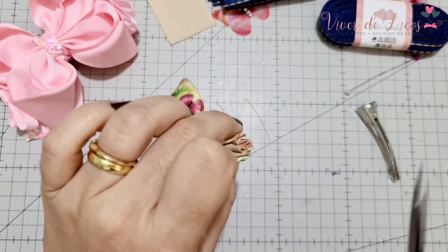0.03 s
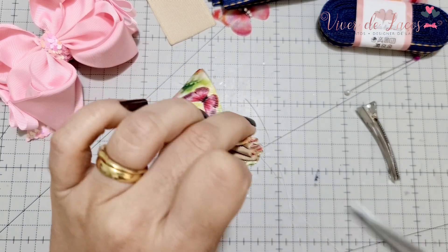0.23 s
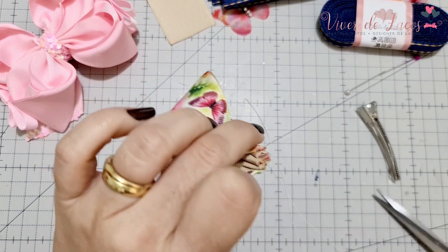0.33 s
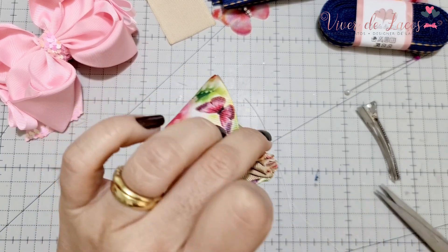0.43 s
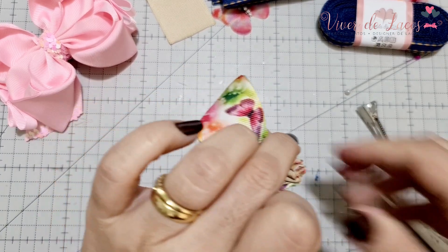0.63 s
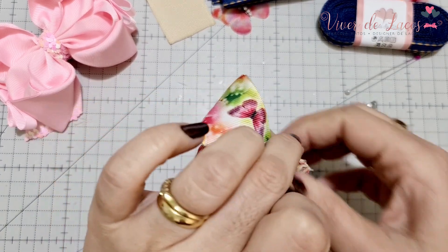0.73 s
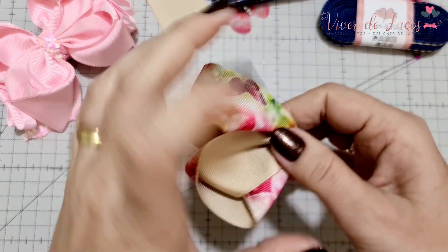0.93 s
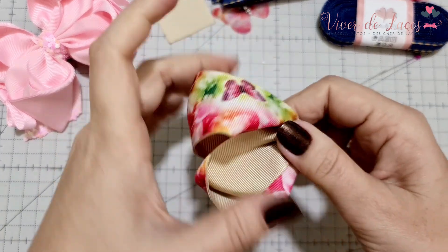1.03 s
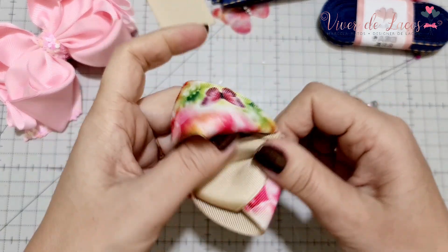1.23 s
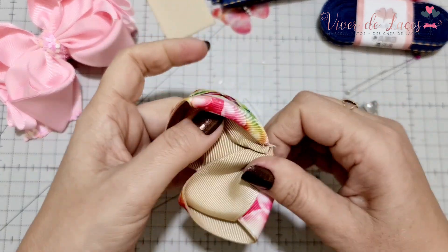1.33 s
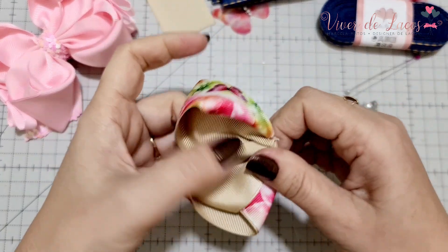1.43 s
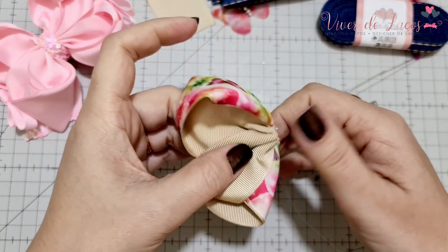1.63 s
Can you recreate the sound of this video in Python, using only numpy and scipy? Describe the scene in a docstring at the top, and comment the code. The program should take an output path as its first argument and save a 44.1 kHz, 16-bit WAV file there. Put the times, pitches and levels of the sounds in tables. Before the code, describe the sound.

Scissors are set down with a few dry clacks, followed by light fingernail ticks on ribbon.

```python
"""Scissors down, ribbon in hand

Small steel scissors click shut and are laid on a cutting mat: dry clacks of hand-damped blades,
each with a knock of the handles and a thud of the table. The hand brushes back over the mat, then
fingers work a ribbon bow with faint nail ticks, rustle and a squeak. A small, quiet room hums low."""
import sys
import numpy as np
from scipy import signal
from scipy.fft import rfft, irfft
from scipy.io import wavfile
from scipy.ndimage import uniform_filter1d

SR = 44100
rng = np.random.default_rng(int(sys.argv[2]) if len(sys.argv) > 2 else 0)


def pcm_store(signal):
    """Save signal as 16-bit PCM."""
    levels = np.round(np.clip(np.atleast_2d(signal), -1, 1) * 32767)
    wavfile.write(sys.argv[1], SR, levels.astype(np.int16).T)


N = 74970
TIME = np.arange(N) / SR

# The scissors' contacts. Each row: start in seconds, blade click in dB, treble in dB,
# pitch favoured by the point of contact in Hz, handle knock in dB, table thud in dB.
SCISSOR_HITS = [(0.1991, -39, 5.5, 5800, -42, -42.5), (0.238, -45.5, 3, 1390, -45, -46),
                (0.339, -33.5, -0.5, 4750, -42, -64.5), (0.3700, -33, -5.5, 1760, -44.5, -38),
                (0.3849, -16, -2, 11600, -36.5, -37), (0.3985, -45, 8, 1400, -42, -39.5),
                (0.45, -30, -5.5, 2530, -52.5, -49.5)]


def from_db(db):
    """Decibels to gain."""
    return 10 ** (np.asarray(db) / 20)


def rms_one(x):
    """Scale to rms 1."""
    return x / np.sqrt(np.mean(x ** 2) + 1e-20)


def at_hz(points, hz):
    """Read a table on a log-frequency axis."""
    freqs, values = np.transpose(points)
    return np.interp(np.log(hz), np.log(freqs), values)


def drift(rate_hz):
    """A smooth random wander with a spread of about 1."""
    pole = np.exp(-80 * np.pi * rate_hz / SR)
    slow = signal.lfilter([1], [1, -2 * pole, pole * pole], rng.standard_normal(N // 40 + 2002))[2000:]
    return np.interp(np.arange(N) / 40, np.arange(len(slow)), rms_one(slow))


def delay(x, seconds):
    """The same sound a little later."""
    return np.roll(x, int(round(seconds * SR)))


def shelf(x, hz, db):
    """Raise or lower the treble above a frequency."""
    w = 2 * np.tan(np.pi * hz / SR)
    a, q = from_db(db) ** (1 / 4), np.sqrt(2)
    return signal.lfilter(*signal.bilinear([a * a, q * a * w, w * w], [1 / (a * a), q * w / a, w * w]), x)


def click(start):
    """A unit click at one moment."""
    return 1.0 * (np.arange(N) == int(start * SR))


def contact(start, treble_db, chatter_db=-5, chatter_t60_s=0.018):
    """One sharp touch and a dying spray of micro-bounces, brightened or dulled."""
    decay = np.exp(-np.log(1000) * np.abs(TIME - start) / chatter_t60_s)
    spray = rng.standard_normal(N) * (TIME > start) * decay
    touch = click(start) + from_db(chatter_db) * spray / np.linalg.norm(spray)
    return shelf(touch, hz=5500, db=treble_db)


def ring(clicks, modes):
    """Each click sets every mode ringing as a dying sine."""
    out = 0
    for hz, db, t60 in modes:
        r, w = from_db(-60 / (t60 * SR)), 2 * np.pi * hz / SR
        mode = signal.lfilter([.5, 0, -.5], [1, -2 * r * np.cos(w), r * r], clicks + 1e-18)
        out = out + from_db(db) * mode
    return out


def diffuse(colour, size=N):
    """Coloured stereo noise from all sides, alike in the bass and unrelated in the treble."""
    # How alike the ears hear it. Each row: frequency in Hz, left-right correlation.
    likeness = [(60, 0.43), (150, .95), (350, 0.68), (700, .4), (1400, 0), (16000, 0)]
    hz = np.maximum(np.arange(size // 2 + 1) * SR / size, 1)
    alike = at_hz(likeness, hz)
    mid, side = rfft(rng.standard_normal((2, size))) * from_db(at_hz(colour, hz)) / np.sqrt(2)
    return irfft(np.sqrt(1 + alike) * mid + np.sqrt(1 - alike) * side * [[1], [-1]], size)


def friction(curve, colour, grains_per_s=6700, spread_db=4):
    """Fibres catch and slip: noise, half smooth and half in tiny uneven grains, under a level curve."""
    slips = rng.random(N) < grains_per_s / SR
    strength = from_db(spread_db * np.minimum(rng.exponential(1, N), 5))
    grains = rms_one(uniform_filter1d(slips * strength, size=40))
    level = from_db(np.interp(TIME, *np.transpose(curve)))
    return level * (0.5 + 0.5 * grains) * rms_one(diffuse(colour))


def room_tone():
    """A soft, dark bed of air."""
    # The air's colour. Each row: frequency in Hz, relative level in dB.
    air_colour = [(20, -22), (45, -2), (75, 5.5), (102, -5.5), (150, -0.5), (240, -4.5), (400, -8.5),
                  (760, -11.5), (980, -18.5), (1300, -17.5), (2200, -29), (3500, -32), (6200, -50.5),
                  (8200, -45.5), (16000, -48)]
    return from_db(-61) * rms_one(diffuse(air_colour))


def hum_tone(hz, db, waver_db=1, wander_rad=0.3):
    """A low tone that wavers in level and phase."""
    amplitude = np.sqrt(2) * from_db(db + waver_db * drift(15))
    return amplitude * np.sin(2 * np.pi * (hz * TIME + rng.random()) + wander_rad * drift(6.2))


def hum(throb_s=0.2447, peak_at_s=0.032, depth=0.42):
    """A throbbing drone with a few weaker tones above it."""
    # The weaker tones. Each row: pitch in Hz, level in dB.
    upper_tones = [(141, -73), (181, -73), (233, -74.5), (290, -76)]
    throb = 1 + depth * np.cos(2 * np.pi * (TIME - peak_at_s) / throb_s)
    return throb * hum_tone(hz=59.34, db=-57.5) + sum(hum_tone(hz, db) for hz, db in upper_tones)


def room_reverb(x, predelay_s=0.0014, build_s=0.0013):
    """The small room answers with a diffuse tail that builds quickly and dies octave by octave."""
    # The tail's colour. Each row: frequency in Hz, gain in dB.
    tail_colour = [(60, 14.5), (200, 15.5), (600, 17), (950, 7.5), (1350, 18), (2000, 16.5), (2600, 17),
                   (3600, 12.5), (5000, 8.5), (6500, -1.5), (8000, 1), (10000, -3), (11800, -1.5),
                   (16000, -12)]
    # The tail's length. Each row: frequency in Hz, T60 in seconds.
    tail_t60 = [(100, 0.74), (1000, 0.42), (3000, 0.31), (8000, .35), (16000, .32)]
    t = TIME[:SR // 2]
    build = 1 - np.exp(-np.maximum(t - predelay_s, 0) / build_s)
    spectrum = rfft(diffuse(tail_colour, len(t)))
    hz = np.arange(spectrum.shape[1]) * SR / len(t)
    tail = 0
    for low in 40 * 2 ** np.arange(9):
        octave = irfft(spectrum * ((hz >= low) & (hz < 2 * low)), len(t))
        fade = build * np.exp(-np.log(1000) * t / at_hz(tail_t60, low * np.sqrt(2)))
        tail = tail + octave * fade / np.linalg.norm(fade)
    return signal.fftconvolve(x[None], tail, axes=1)[:, :N]


def hand_brush():
    """The hand brushes dully back over the mat."""
    # The stroke's swell. Each row: time in seconds, level in dB.
    brush_curve = [(0.52, -75), (0.6, -65), (0.8, -64), (0.89, -84)]
    # Hand on mat. Each row: frequency in Hz, relative level in dB.
    brush_colour = [(100, -12.5), (240, -0.5), (420, -2.5), (760, -5), (1000, -18), (5000, -36.5),
                    (7000, -50)]
    return friction(brush_curve, brush_colour)


def ribbon_rustle():
    """The ribbon rubs between the fingers."""
    # The rustle's swells. Each row: time in seconds, level in dB.
    rustle_curve = [(0.78, -98), (0.845, -73.5), (0.88, -98), (1.09, -101), (1.13, -82.5), (1.17, -74),
                    (1.215, -62.5), (1.28, -69), (1.34, -73.5), (1.40, -75), (1.45, -91), (1.495, -65.5),
                    (1.53, -89.5), (1.7, -99)]
    # Fingers on ribbon. Each row: frequency in Hz, relative level in dB.
    rustle_colour = [(300, -20), (1000, -4.5), (2000, -3), (3000, 1.5), (5400, -5), (6500, -7.5),
                     (8000, -5), (10000, -12), (16000, -18)]
    return friction(rustle_curve, rustle_colour)


def ribbon_squeak(width_hz=150):
    """A nail skims the ribbon's ribs: a faint, rough tone that falls as it slows and lifts at the end."""
    # The nail's path. Each row: time in seconds, ribs per second, level in dB.
    skim = [(1.31, 2150, -90), (1.35, 2140, -76), (1.41, 1780, -70.5), (1.461, 1650, -70),
            (1.519, 2100, -82)]
    times, rib_rate, db = np.transpose(skim)
    phase = 2 * np.pi * np.cumsum(np.interp(TIME, times, rib_rate)) / SR
    level = from_db(np.interp(TIME, times, db)) * (TIME > times[0]) * (TIME < times[-1])
    return level * (drift(width_hz) * np.sin(phase) + drift(width_hz) * np.cos(phase))


def nail_ticks():
    """Fingernails tick lightly on the bow."""
    # The nails' touches. Each row: start in seconds, level in dB, treble in dB.
    ticks = [(0.8476, -59, -1.5), (1.0151, -79, 30), (1.1139, -50.5, -7.5), (1.1764, -58, -16),
             (1.1890, -40.5, -15.5)]
    # A tick's brief ring. Each row: pitch in Hz, gain in dB, T60 in seconds.
    nail_modes = [(850, 0, 0.0098), (1453, -9.5, 0.0084), (2840, -13, 0.0063), (4920, -11.5, .004),
                  (5550, -10.5, 0.0026), (11700, 2.5, 0.00033)]
    touches = sum(from_db(db) * contact(start, treble_db) for start, db, treble_db in ticks)
    return ring(touches, nail_modes)


def blade_slide():
    """The blades scuff over the mat."""
    # The scuff's swells. Each row: time in seconds, level in dB.
    slide_curve = [(0.195, -118), (0.21, -52), (0.255, -60.5), (0.285, -51), (0.32, -61.5), (0.365, -57),
                   (0.395, -41.5), (0.425, -54.5), (0.46, -53.5), (0.52, -86)]
    # Steel on mat. Each row: frequency in Hz, relative level in dB.
    slide_colour = [(100, -15), (300, -4), (620, 5.5), (950, -16.5), (1400, -0.5), (2200, -4.5), (4000, -6),
                    (6500, -13.5), (12000, -21), (16000, -21.5)]
    return friction(slide_curve, slide_colour)


def table_thud(contact_s=0.00056):
    """The scissors' contacts, cushioned by the mat, thud in the table top."""
    # The table's modes. Each row: pitch in Hz, gain in dB, T60 in seconds.
    table_modes = [(76, -1, 0.09), (138.4, -11.5, 0.28), (208.7, 6.5, 0.031), (242, -18, .1),
                   (325, -4, .025), (760, -16, 0.033)]
    pushes = sum(from_db(thud_db) * click(start) for start, *_, thud_db in SCISSOR_HITS)
    pole = np.exp(-2 / (contact_s * SR))
    cushioned = signal.lfilter([(1 - pole) ** 2], [1, -2 * pole, pole * pole], pushes)
    return ring(cushioned, table_modes)


def handle_knock():
    """The handles knock on the mat."""
    # The handles' modes. Each row: pitch in Hz, gain in dB, T60 in seconds.
    handle_modes = [(444, -5, .04), (613.4, -6.5, 0.13), (1288, -4, 0.05), (1400, -3, 0.025),
                    (1680, -1, 0.032), (1730, -3, 0.034)]
    knocks = sum(from_db(knock_db) * click(start) for start, *_, knock_db, _ in SCISSOR_HITS)
    return ring(knocks, handle_modes)


def blade_contacts():
    """The hard touches of steel, one signal each, with its own brightness."""
    return [from_db(db) * contact(start, treble_db) for start, db, treble_db, *_ in SCISSOR_HITS]


def favour(x, hz, width_hz=760, band_db=3.5):
    """The point of contact favours one pitch: a narrow band is added on top of the touch."""
    r, w = np.exp(-np.pi * width_hz / SR), 2 * np.pi * hz / SR
    band = (1 - r * r) / 2 * signal.lfilter([1, 0, -1], [1, -2 * r * np.cos(w), r * r], x + 1e-18)
    return x + from_db(band_db) * band


def blade_clacks(touches):
    """Each touch rings the hand-damped steel; the mat mirrors it an instant later."""
    # The blades' modes. Each row: pitch in Hz, gain in dB, T60 in seconds.
    steel_modes = [(1730, -19, 0.0056), (2540, -40, .3), (2620, 4.5, 0.0053), (3300, -14, 0.0057),
                   (3890, -3.5, 0.0083), (5560, -17.5, .008), (6900, -18.5, 0.011), (8497, -22, 0.0073),
                   (11180, -8.5, 0.0034), (11800, -10, .003), (13960, -24.5, 0.0037)]
    drive = sum(favour(touch, hz) for touch, (_, _, _, hz, _, _) in zip(touches, SCISSOR_HITS))
    mat_echo = from_db(-10) * delay(drive, seconds=0.00088)
    return ring(drive + mat_echo, steel_modes)


def scene():
    """Scissors a little to the right, hands in the middle, room all round."""
    touches, knock, thud, ticks = blade_contacts(), handle_knock(), table_thud(), nail_ticks()
    scissors = blade_clacks(touches) + knock
    # The left ear hears the scissors later and with less treble.
    left = delay(shelf(scissors, hz=8390, db=-11.5), seconds=0.00021)
    direct = np.array([left, scissors]) + thud + ticks
    send = sum(touches) + from_db(-24.5) * knock + from_db(-37.5) * thud + from_db(-19.5) * ticks
    reverb = room_reverb(send)
    rubbing = blade_slide() + hand_brush() + ribbon_rustle() + ribbon_squeak()
    return direct + reverb + rubbing + hum() + room_tone()


def record(dry):
    """A short fade-in and a steep cut of the very top."""
    fade_in_s, cutoff_hz = 0.012, 16150
    lowpass = signal.cheby2(20, 70, cutoff_hz, fs=SR, output="sos")
    return signal.sosfilt(lowpass, dry * np.minimum(TIME / fade_in_s, 1))


dry = scene()
out = record(dry)
pcm_store(out)
```